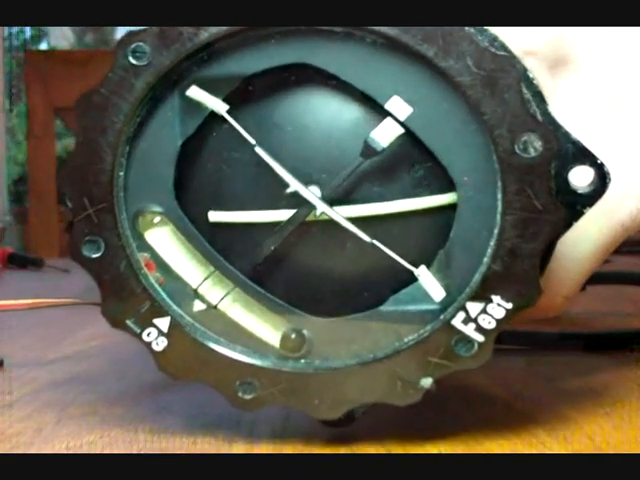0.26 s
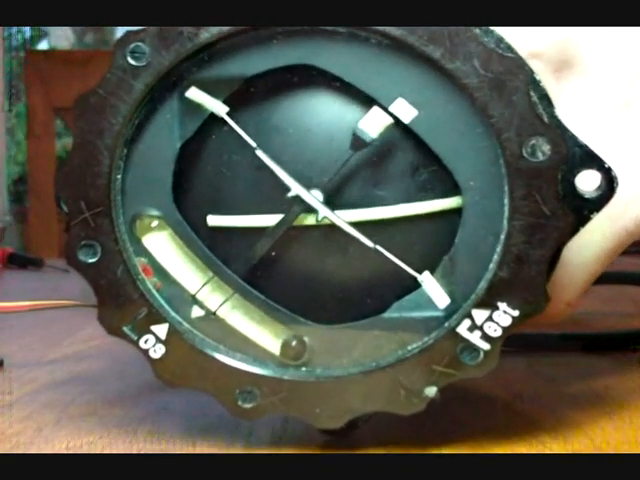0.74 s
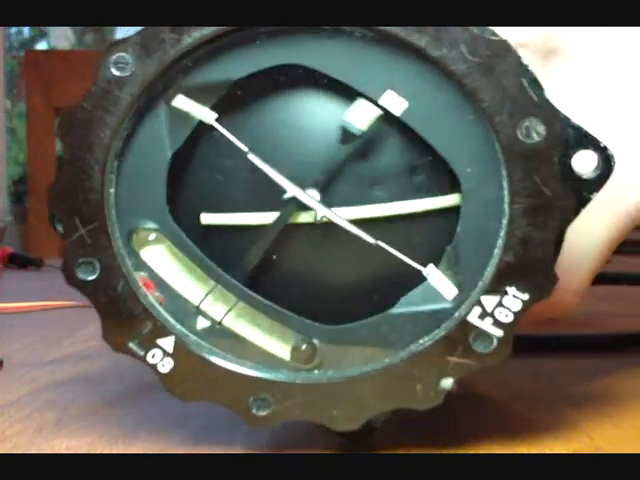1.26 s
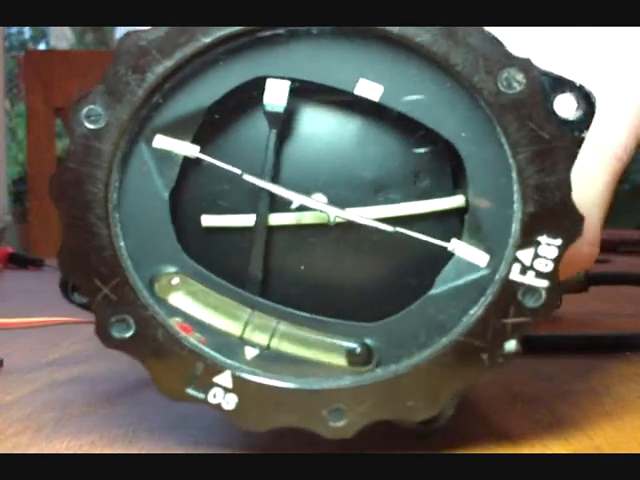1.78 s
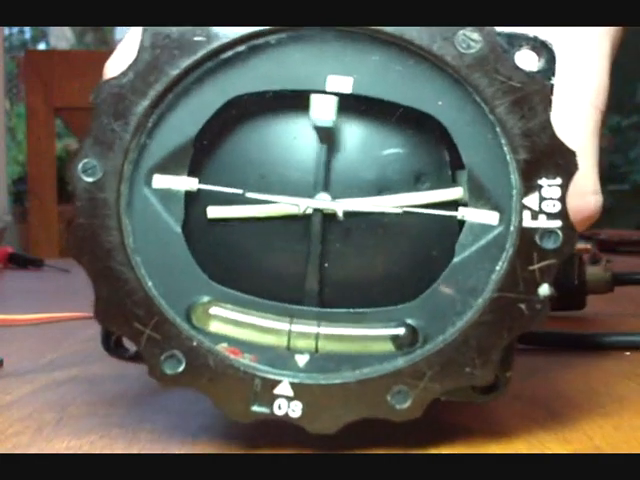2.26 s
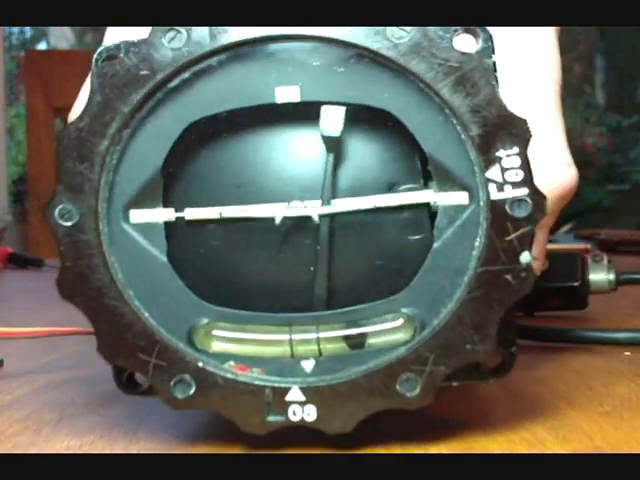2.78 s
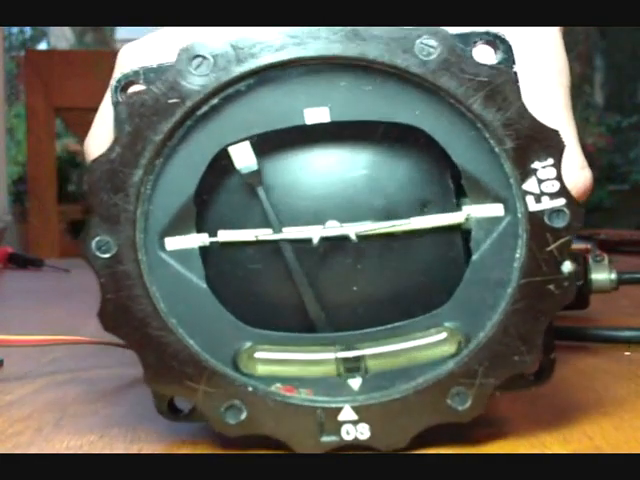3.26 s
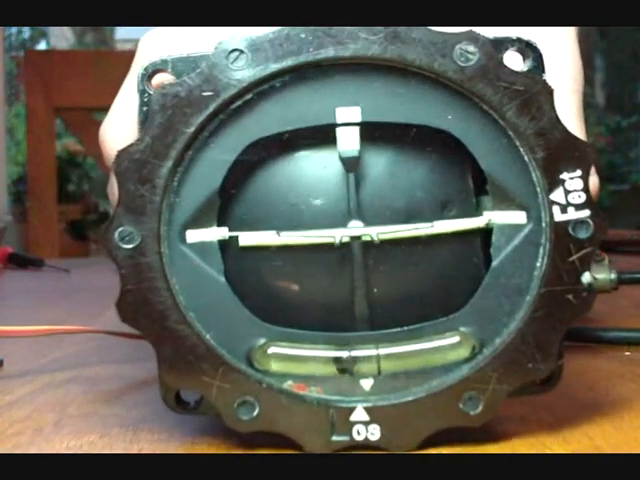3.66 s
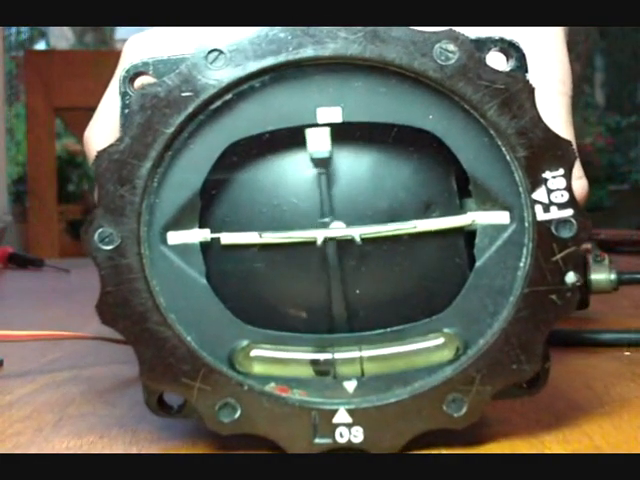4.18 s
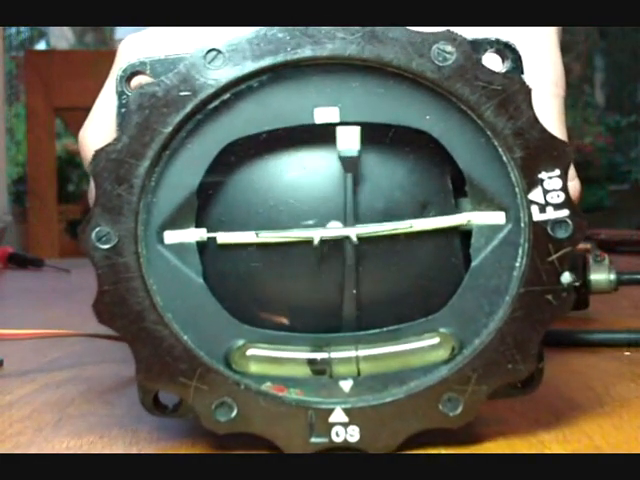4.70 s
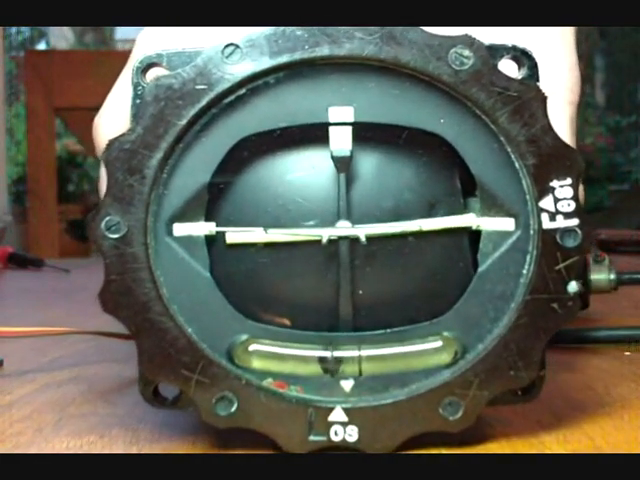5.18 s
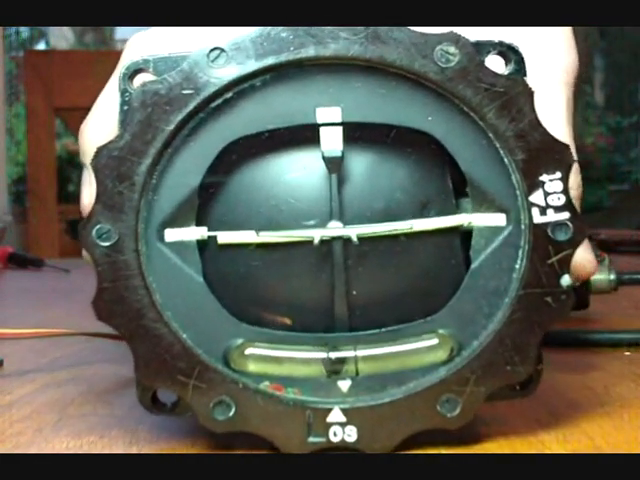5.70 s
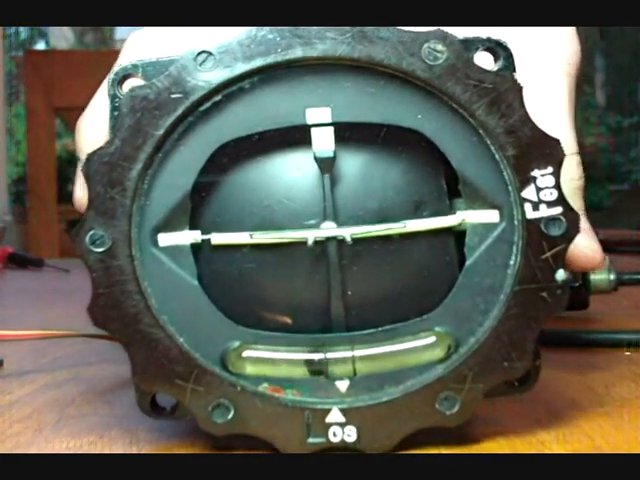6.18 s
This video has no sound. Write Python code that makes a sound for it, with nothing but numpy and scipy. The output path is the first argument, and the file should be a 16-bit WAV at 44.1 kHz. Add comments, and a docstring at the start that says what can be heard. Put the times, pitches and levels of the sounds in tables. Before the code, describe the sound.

Close to a small, slightly dull microphone in a room, an old electric gyro runs at constant speed. A low hum sits under a rough bearing rush and a fluttering, nasal metallic whine. The casing rings in irregular chattering surges, with faint dull hand rubs as it is tilted upright. Once held still, a lower tone grows. At the very end the case clacks on the wooden bench and everything cuts off.

```python
"""On a wooden bench, a hand tilts an old electric gyro horizon at full speed close to a small microphone.
The rotor's unbalance hums, the AC supply and the ball races whine: all three are fluttering sine tones.
Balls on rough races, as filtered noise, rush and make the case ring in chattering bursts.
Dull noise rubs mark the case in the hand, and a lower race tone comes up once it is held still.
Near the end the case knocks on the bench: short pushes into damped modes, with a diffuse room tail."""
import sys
import numpy as np
from scipy import signal
from scipy.fft import rfft, irfft
from scipy.io import wavfile
from scipy.ndimage import uniform_filter1d

SR = 44100
rng = np.random.default_rng(int(sys.argv[2]) if len(sys.argv) > 2 else 0)


def store_pcm(level_fs):
    """Save levels as 16-bit WAV."""
    pcm = np.round(np.clip(level_fs, -1, 1) * 32767).astype(np.int16)
    wavfile.write(sys.argv[1], SR, np.atleast_2d(pcm).T)


N = 284004

T = np.arange(N) / SR  # s
FREQ = np.maximum(np.arange(N // 2 + 1) * SR / N, 1)  # Hz

# the hand turns the case nearly upright: [t/s, lean 0-1]
LEAN_PATH = [(1.95, 1), (2.55, 0.12)]
STILL_S, SETTLE_S = 4.52, 0.57  # the case is held still from here, and settles over this time

# rubs of the case in the hand: [t/s, length/s, peak level/dB]
HAND_RUBS = [(.2, .04, -37), (1.5, .05, -38), (3.04, .035, -35), (3.13, .04, -30.5), (3.21, .03, -31),
             (3.41, .025, -32.5), (3.64, .03, -35)]
# colour of those rubs: [f/Hz, relative level/dB per Hz]
RUB_OUTLINE = [(20, -8), (55, 0), (130, -5), (200, -8), (330, -6), (700, -22), (3000, -60)]

# the case rocks onto the bench: [t/s, relative level/dB, contact time/s, f/Hz favoured by the struck spot]
BENCH_KNOCKS = [(6.278, 9.5, 0.0015, 140), (6.286, 3.5, 0.00051, 990), (6.294, 8.5, 0.00061, 640),
                (6.313, 11, 0.00092, 446), (6.327, 4.5, 0.00041, 1000)]
# modes of case and bench top, damped by the hand: [f/Hz, relative level/dB, t60/s]
BENCH_MODES = [(138, -28.5, 0.17), (194.3, -12, 0.11), (350, -23, 0.032), (460, -19.5, 0.055),
               (650, -8.5, 0.062), (800, -9.5, 0.04), (1015, -13, 0.063), (1430, -14, 0.043),
               (1800, -27.5, .04)]

ROTOR_HZ, SUPPLY_HZ, RACE_HZ = 122.45, 440.1, 234.75
# orders of the shaft: [multiple of ROTOR_HZ, level/dB re unbalance, flutter 0-1]
SHAFT_ORDERS = [(1, 0, .025), (2, -21, .15), (3, -24, .15)]
# magnetic pull in the stator: [multiple of SUPPLY_HZ, level/dB re supply, flutter 0-1]
STATOR_ORDERS = [(1, -13, .1), (2, 1, .15), (4, -21, .2)]
# a magnetic slip tone, its beat rate, and a moment when the beat is loudest
SLIP_HZ, BEAT_HZ, BEAT_TOP_S = 613.4, 1.064, .76

# balls passing over the outer race: [multiple of RACE_HZ, upright level/dB,
# change at full lean/dB, change when held still/dB, flutter 0-1]
RACE_ORDERS = [(2, -35.5, -5, -2, 0.6), (3, -36, -5.5, -1.5, 0.8), (4, -23.5, 1, 1.5, 0.42)]
# steady tones of bearings and motor: [f/Hz, upright level/dB, change at full lean/dB, flutter 0-1]
WHINE_TONES = [(99.8, -47, 0, .1), (241.4, -43, -2, .15), (491.2, -44, -2, .4), (704.9, -38, -3, .4),
               (765.8, -31.5, 1, .12), (854.6, -39, 0, .3), (861.3, -42, 4, .3), (971.5, -23.5, -3, .45),
               (1017.4, -35, 0, .4), (1181.6, -41, 6, .25), (1205.9, -39, 8, .2), (1320.3, -37, 5.5, .2),
               (1410.4, -42, 0, .5), (1845.1, -31.7, 1, .2), (1928.6, -47, 0, .3), (1954.1, -38, 0, .15),
               (1962.2, -44, 0, .2), (2063.2, -43, 0, .2), (2087.4, -51, 0, .3), (2248.9, -48.5, 0, .2),
               (2332, -41.5, 0, .3), (2565.1, -51, 0, .2), (2663.4, -51, 0, .2), (2950, -48, 0, .15),
               (3072.5, -52, 0, .2), (4293.2, -56, 0, .2), (5029.3, -59, 0, .2), (5408.9, -56, 0, .2),
               (5437.1, -57, 0, .2), (5496.4, -59, 0, .2), (6350.9, -71, 0, .3), (6718.4, -60.5, 0, .15),
               (7206.9, -67, 0, .2)]
# a high bearing tone is chopped once a turn into sidebands; their strength: [f/Hz, level/dB]
COMB_OUTLINE = [(2440, -54), (2810, -55), (3050, -47), (3180, -59), (3780, -58), (4100, -65), (4400, -57),
                (4900, -61)]
COMB_HZ = 3053.7

# main resonances of the case: [f/Hz, width/Hz, relative level/dB]
CASE_RING = [(963, 47.4, -8.5), (977.2, 14.2, -8.5)]
# broader panel resonances: [f/Hz, width/Hz, upright level/dB re rush, change at full lean/dB]
CASE_PANELS = [(485.3, 24, -39, -1), (700, 70, -33.5, -2.5), (1413, 244, -27.5, 1), (3923, 280, -43, -3.5),
               (5340, 210, -47, 2)]
# colour of the rush of the ball races: [f/Hz, relative level/dB per Hz]
RUSH_OUTLINE = [(20, -3.5), (45, -5), (150, -9), (330, -9), (560, -0.5), (820, 1.5), (1080, 6.5),
                (1250, -3), (1530, -6.5), (1680, -5.5), (2200, -4.5), (3000, -10.5), (3400, -15),
                (4170, -20.5), (4400, -13), (4850, -17), (5100, -23.5), (5750, -21.5), (6050, -33.5),
                (7400, -34.5)]
# bursts of ball chatter that make the case sing: [t/s, length/s, ringing level/dB before RING_NOISE]
CHATTER_BURSTS = [(0.307, 0.17, -19.5), (0.871, 0.08, -17), (1.488, 0.064, -16), (1.826, 0.2, -17),
                  (2.594, 0.11, -17.5), (2.851, 0.1, -18.5), (3.208, 0.13, -19), (3.777, 0.054, -15.5),
                  (3.96, 0.24, -14.5), (4.372, 0.15, -18), (4.714, 0.12, -18), (5.237, 0.56, -16)]
CHATTER_ATTACK_S, CHATTER_RELEASE_S = .025, .03
# waver of the ringing between bursts: rate limit, signed swing upright, change of swing at full lean;
# the size of the swing is smaller while the case leans
WAVER_HZ, WAVER_DB, WAVER_LEAN_DB = 4.1, -1.46, 2
RING_NOISE = 0.77  # amplitude share of the ringing given to its noise

# how the case passes on each vibration: (upright level/dB, change at full lean/dB, change when held still/dB)
UNBALANCE_DB = (-18.5, 0, -2)
SUPPLY_DB = (-25, -9, -0.2)
RACE_DB = (-37.5, -5.5, 16)
RUSH_DB = (1, -1, 0.6)
RING_DB = (-19.5, -1.5, 0.5)

MIC_HZ, TOP_HZ = 7350, 16000  # upper edges of the microphone and of the final low-pass


def undb(db):
    """Decibels to gain."""
    return 10 ** (np.asarray(db) / 20)


def unit(x):
    """Scale to spread 1, so that later gains set the level."""
    return x / np.std(x)


def curves(table):
    """The columns of a table, joined by straight lines in time."""
    times, *columns = np.transpose(table)
    return [np.interp(T, times, column) for column in columns]


def colour(points, hz):
    """Gain at hz of an outline, straight in dB over log frequency."""
    f, db = np.transpose(points)
    return undb(np.interp(np.log(hz), np.log(f), db))


def resonance(hz, width_hz):
    """Frequency response of one damped mode."""
    return 1 / (1 + 1j * hz / width_hz * (FREQ / hz - hz / FREQ))


def noise(response):
    """Noise of rms 1 with the given frequency response."""
    spectrum = rfft(rng.standard_normal(N)) * response
    return unit(irfft(spectrum, N))


def wander(rate_hz):
    """Smooth chance of spread 1, mostly slower than rate_hz."""
    return noise(1 / (1 + (FREQ / rate_hz) ** 2))


def tone(hz, flutter, clock, flutter_hz=9):
    """A line of rms 1 whose size and phase flutter by chance."""
    steps = np.arange(0, T[-1] + 1, .5 / flutter_hz)
    draws = rng.standard_normal((2, len(steps)))
    in_phase, quadrature = (np.interp(T, steps, row) for row in draws)
    phase = 2 * np.pi * (hz * clock + rng.random())
    return unit((1 + flutter * in_phase) * np.sin(phase) + flutter * quadrature * np.cos(phase))


def posture(upright_db, lean_db, still_db):
    """Level in dB of one vibration while the case leans, comes upright and is held still."""
    lean, = curves(LEAN_PATH)
    still = np.clip((T - STILL_S) / SETTLE_S, 0, 1)
    return upright_db + lean * lean_db + still * still_db


def handling():
    """Dull rubs of the case in the hand: coloured noise under short swells of pressure."""
    pressure = sum(undb(db) * np.exp(-((T - s) / length) ** 2) for s, length, db in HAND_RUBS)
    return pressure * noise(colour(RUB_OUTLINE, FREQ))


def knocks(tail_db=-22, tail_t60=0.57, spot_db=6):
    """Each contact is a short push into the modes of case and bench, with a diffuse tail from the room."""
    t = T[:SR // 2]
    out = np.zeros(N)
    air = colour([(60, -34), (170, 5), (300, -2.5), (480, 10.5),
                  (1000, 6), (1600, -9), (4000, -21), (8000, -58)], FREQ)
    for s, db, contact, spot_hz in BENCH_KNOCKS:
        body = 0
        for hz, mode_db, t60 in BENCH_MODES:
            # modes near the pitch of the struck spot ring louder
            boost_db = spot_db * np.exp(-(np.log(hz / spot_hz) / 0.16) ** 2)
            body = body + undb(mode_db + boost_db - 60 * t / t60) * np.cos(2 * np.pi * hz * t)
        room = undb(tail_db - 60 * t / tail_t60) * noise(air)[:len(t)]
        # a longer contact softens the treble
        push = np.exp(-np.pi * ((T - s) / contact) ** 2)
        out += undb(db) * signal.fftconvolve(push / push.sum(), body + room)[:N]
    return out


def motor(clock, unbalance_db, supply_db, slip_db=-29.0, beat_depth=0.74):
    """The unbalanced rotor shakes the case once a turn; the stator sings at the supply's multiples."""
    hum = sum(undb(db) * tone(k * ROTOR_HZ, flutter, clock) for k, db, flutter in SHAFT_ORDERS)
    stator = sum(undb(db) * tone(k * SUPPLY_HZ, flutter, T) for k, db, flutter in STATOR_ORDERS)
    beat = np.abs(1 + beat_depth * np.exp(2j * np.pi * BEAT_HZ * (T - BEAT_TOP_S)))
    slip = unit(beat * tone(SLIP_HZ, .08, clock))
    return undb(unbalance_db) * hum + undb(supply_db) * stator + undb(slip_db) * slip


def bearings(clock, race_db, ring_db):
    """Ball-pass tones, the whine, and sidebands spaced by the shaft rate."""
    swell = undb(ring_db - ring_db.mean())
    lines = [(k * RACE_HZ, posture(db, lean_db, still_db), flutter)
             for k, db, lean_db, still_db, flutter in RACE_ORDERS]
    lines += [(hz, posture(db, lean_db, 0), flutter) for hz, db, lean_db, flutter in WHINE_TONES]
    out = undb(race_db) * tone(RACE_HZ, 0.12, clock)
    ring_hz, ring_width_hz, _ = CASE_RING[0]
    for hz, db, flutter in lines:
        # tones that sit on the first case resonance swell with it
        on_ring = abs(hz - ring_hz) < ring_width_hz
        out += undb(db) * tone(hz, flutter, clock) * (swell if on_ring else 1)
    for hz in COMB_HZ + ROTOR_HZ * np.arange(-5, 16):
        out += colour(COMB_OUTLINE, hz) * tone(hz, .2, clock)
    return out


def chatter():
    """Level in dB of the ringing: it wavers at rest, goes to each burst's level, holds and returns."""
    lean, = curves(LEAN_PATH)
    swing_db = WAVER_DB + lean * WAVER_LEAN_DB
    ring_db = posture(*RING_DB) + swing_db * np.tanh(wander(WAVER_HZ))
    for s, length, db in CHATTER_BURSTS:
        rise = np.clip((T - s) / CHATTER_ATTACK_S + .5, 0, 1)
        fall = np.clip((s + length - T) / CHATTER_RELEASE_S + .5, 0, 1)
        ring_db = ring_db + rise * fall * (db - ring_db)
    return ring_db


def rolling(clock, ring_db, rush_db):
    """Balls on rough races drive the case's resonances, a little harder once each turn."""
    lean, = curves(LEAN_PATH)
    ring = sum(undb(db) * noise(resonance(hz, width) * resonance(hz, 4 * width))
               for hz, width, db in CASE_RING)
    # even out the slow surges over 1/8 s, keep the quick flutter; ring_db then sets the slow level
    ring = ring / np.sqrt(uniform_filter1d(ring ** 2, size=SR // 8))
    panels = sum(undb(db + lean * lean_db) * noise(resonance(hz, width) ** 2)
                 for hz, width, db, lean_db in CASE_PANELS)
    rush = undb(-24) * noise(colour(RUSH_OUTLINE, FREQ))
    load = 1 + .05 * np.sin(2 * np.pi * ROTOR_HZ * clock)
    return load * (RING_NOISE * undb(ring_db) * ring + undb(rush_db) * (panels + rush))


def scene():
    """The heavy rotor keeps its speed almost exactly; all turning parts share its clock."""
    clock = T + np.cumsum(.0002 * wander(0.67)) / SR
    ring_db = chatter()
    hum = motor(clock, posture(*UNBALANCE_DB), posture(*SUPPLY_DB))
    whine = bearings(clock, posture(*RACE_DB), ring_db)
    rattle = rolling(clock, ring_db, posture(*RUSH_DB))
    return (handling() + knocks() + hum + whine + rattle)[None]


def record(dry):
    """A narrow-band microphone rounds the peaks; the loudest are flattened after its low-pass."""
    rounded = dry / (1 + (dry / 1.2) ** 6) ** (1 / 6)
    mic_band = signal.ellip(10, .2, 80, MIC_HZ, fs=SR, output="sos")
    heard = signal.sosfilt(mic_band, rounded)
    clipped = heard / (1 + (heard / .96) ** 60) ** (1 / 60)
    top_band = signal.ellip(8, .2, 70, TOP_HZ, fs=SR, output="sos")
    return signal.sosfilt(top_band, clipped)


dry = scene()
out = record(dry)
store_pcm(out)
```